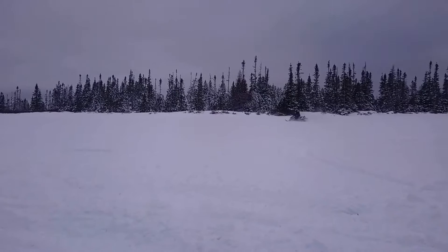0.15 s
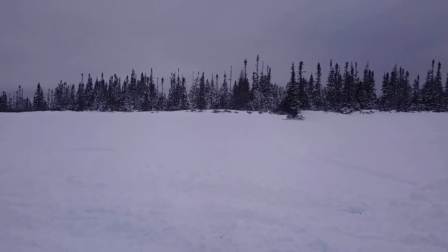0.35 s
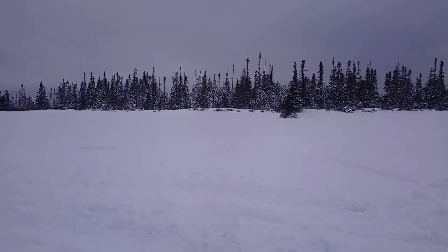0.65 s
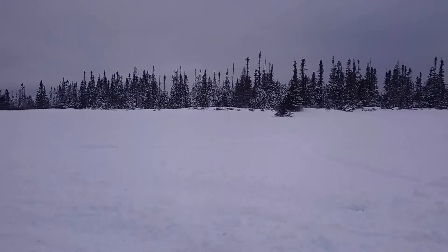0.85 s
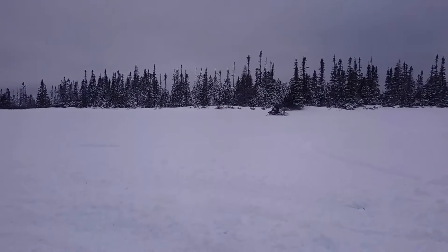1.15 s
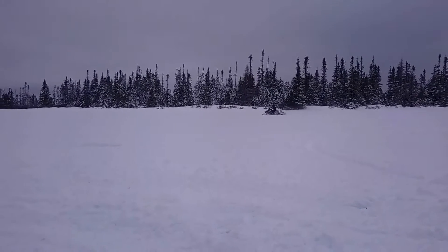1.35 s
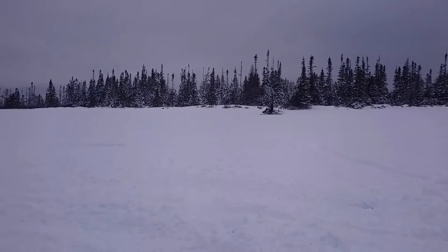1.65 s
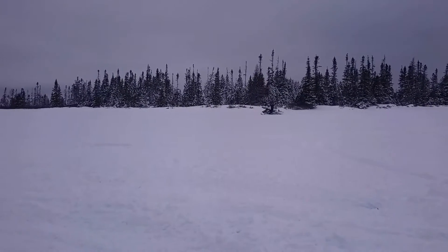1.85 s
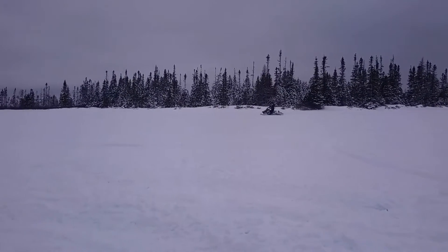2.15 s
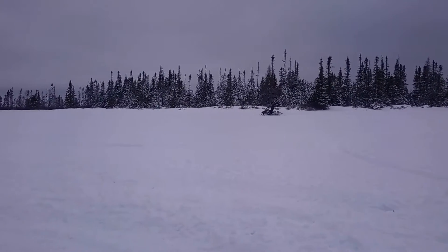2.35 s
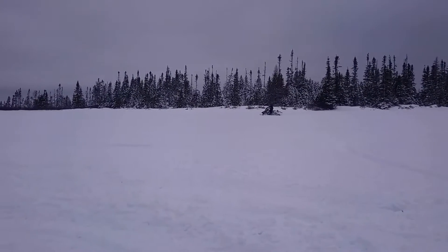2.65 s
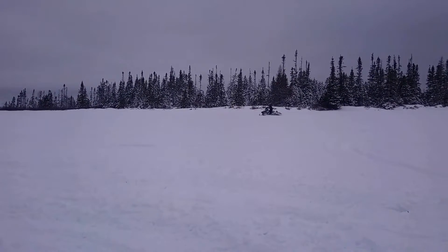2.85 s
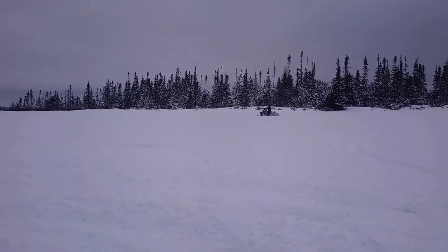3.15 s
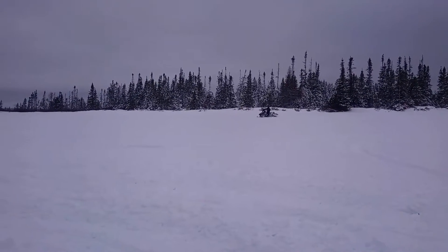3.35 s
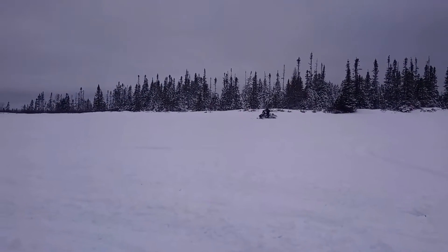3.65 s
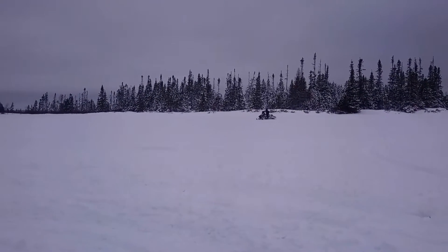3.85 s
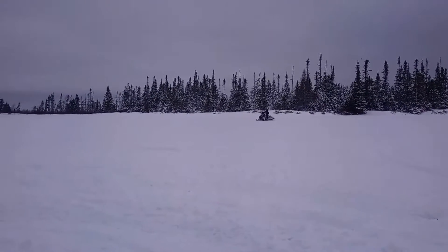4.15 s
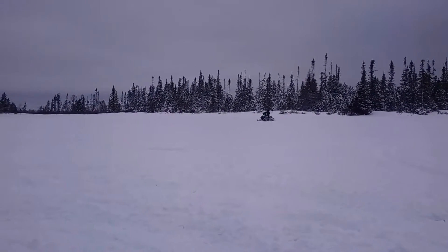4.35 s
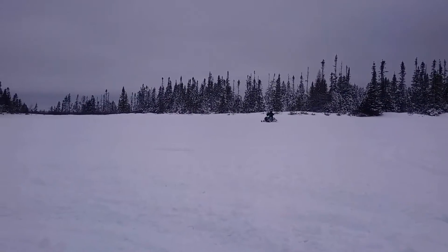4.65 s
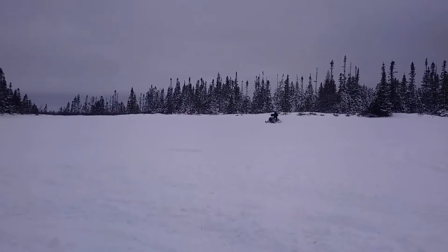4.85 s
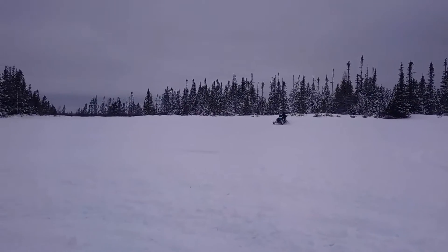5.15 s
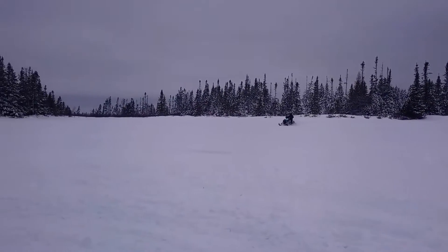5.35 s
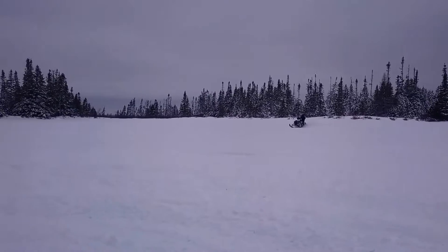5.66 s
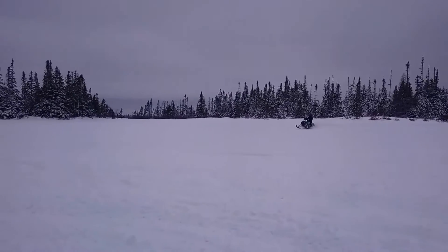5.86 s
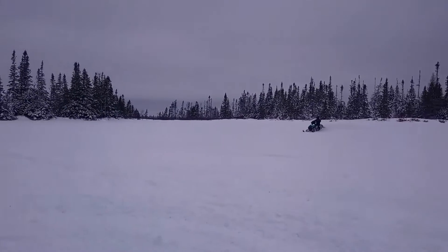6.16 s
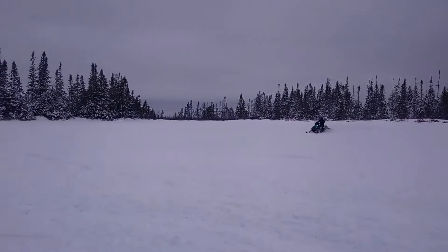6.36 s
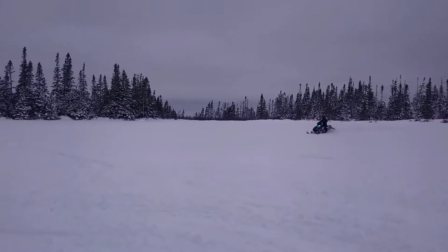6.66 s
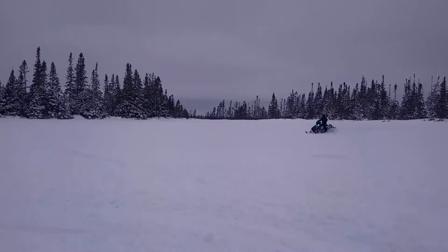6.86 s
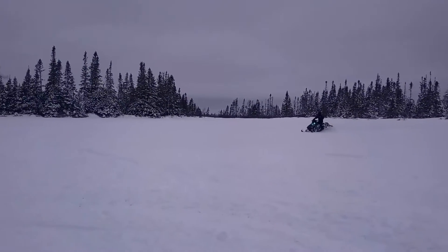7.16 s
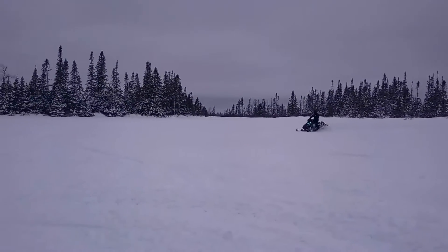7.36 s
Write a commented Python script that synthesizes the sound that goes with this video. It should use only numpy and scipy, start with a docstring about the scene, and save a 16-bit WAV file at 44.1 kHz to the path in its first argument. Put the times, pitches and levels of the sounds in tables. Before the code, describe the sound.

Faint buzzing snowmobile revs from afar over light wind, two sudden loud high-pitched two-stroke bursts with tree echoes, then the engine drops away.

```python
"""Wind buffets two ports over a faint rustle and hiss; then a two-cylinder two-stroke snowmobile blips from afar.
Two hard bursts on the tuned pipe follow, then coasting. The engine is a pulse train mixed with noise, plus
low harmonics; a line of spruces returns it as a convolution with many sparse echoes. Wind, snow spray, field
rustle and hiss are filtered noises. Two unlike ports, set in opposite polarity, colour exhaust, spray and rustle."""
import sys
import numpy as np
from scipy import signal
from scipy.fft import rfft, irfft, next_fast_len
from scipy.io import wavfile
from scipy.ndimage import uniform_filter1d

SR = 44100
rng = np.random.default_rng(int(sys.argv[2]) if len(sys.argv) > 2 else 0)


def wav_out(sig):
    """Save sig, one row per channel (or a flat mono array), as 16-bit PCM at SR to the path in sys.argv[1]."""
    wavfile.write(sys.argv[1], SR, np.round(np.clip(np.atleast_2d(sig).T, -1, 1) * 32767).astype(np.int16))


N = 331191
CONTROL_STEP = 64  # samples between control points


def from_db(db):
    """Level definition: amplitude is ten to the power of level over 20."""
    return 10 ** (np.asarray(db) / 20)


def rms_one(x):
    """Normalization: scale to unit root mean square."""
    return x / np.sqrt(np.mean(x ** 2) + 1e-20)


def in_time(rows, count=N):
    """Linear interpolation: one curve over the samples for each column after t."""
    t, *columns = np.transpose(rows)
    return [np.interp(np.arange(count) / SR, t, column) for column in columns]


def at_hz(points, hz):
    """Logarithmic frequency scale: interpolate a spectrum between its points."""
    table_hz, values = np.array(points).T
    return np.interp(np.log(hz + 1), np.log(table_hz), values)


def butter(x, hz, kind, order=2):
    """Maximally flat filtering: a Butterworth section cascade."""
    return signal.sosfilt(signal.butter(order, hz, kind, fs=SR, output="sos"), x)


def coloured_noise(points):
    """Spectral shaping: two unrelated white noises take a given spectrum, at unit rms."""
    size = next_fast_len(N)
    gain = from_db(at_hz(points, np.fft.rfftfreq(size, 1 / SR)))
    spectrum = rfft(rng.standard_normal((2, size))) * gain
    return rms_one(irfft(spectrum, size)[:, :N])


def drift(rate_hz):
    """Low-pass random process: slow chance for each channel, at unit rms."""
    chance = rng.standard_normal((2, N + SR))
    return rms_one(butter(chance, rate_hz, "low")[:, SR:])  # the filter settles in the first second


def control_time():
    """Decimated time base: the control instants in seconds."""
    return np.arange(0, N + CONTROL_STEP, CONTROL_STEP) / SR


def to_samples(slow):
    """Linear interpolation: bring a control curve to every sample."""
    return np.interp(np.arange(N) / SR, control_time(), slow)


# Gusts on the ports: t/s, mean peak level of the two sides before drift/dB, left minus right/dB
GUST_PEAKS = [(.11, -50, 14), (.44, -50, 7), (.62, -53, 0.5), (.72, -59, 22), (1.09, -56.5, 21),
              (1.28, -56, 6), (1.42, -61, 11), (1.749, -53, 9), (2.049, -61, 21), (2.16, -56, 20),
              (2.76, -52.5, 3), (3.2, -52.5, 17.5), (3.35, -56, 20.5), (3.409, -57.5, 22),
              (3.521, -51.5, 17), (3.83, -59.5, 15), (4.29, -58, 19), (4.73, -57, 19), (4.83, -55, 22),
              (4.98, -53, -24), (5.541, -49, -13), (5.69, -42.5, -14), (5.99, -45, -1), (6.14, -41.5, 1),
              (6.23, -36.5, -9), (6.3, -37, -11), (6.401, -46, -7), (6.47, -49, -11), (7.46, -55, 3)]
GUST_RISE_DB_PER_S, GUST_FALL_DB_PER_S = 286, 253
BREEZE_DB, BREEZE_LEAN_DB = -64, 3.5  # mean of the sides; left minus right


def gusts():
    """Envelope maximum: at each port the strongest gust rules, above the floor of a steady breeze."""
    t, peak_db, lean_db = np.transpose(GUST_PEAKS)[:, :, None]
    since = control_time() - t
    shape = peak_db + np.minimum(GUST_RISE_DB_PER_S * since, -GUST_FALL_DB_PER_S * since)
    sides = []
    for side in (.5, -.5):  # left, right
        strongest = (shape + side * lean_db).max(axis=0)
        sides.append(to_samples(np.maximum(strongest, BREEZE_DB + side * BREEZE_LEAN_DB)))
    return np.array(sides)


# Spectrum of the wind rumble before its bass cut: f/Hz, relative density per Hz/dB
WIND_SPECTRUM = [(12, -54), (20, -22), (22, -43), (41, 3.5), (70, -0.5), (89, -3.5), (221, -22.5),
                 (260, -37), (340, -86), (570, -120)]
WIND_OPPOSED = 0.34  # share of the other port's rumble, inverted
FLUTTER_TOP_HZ = 346
FLUTTER_DB, FLUTTER_GROWTH = -14.5, 1.7  # level re the loudest gust; dB per dB of gust level


def wind():
    """Turbulent pressure: lumpy rumble at each port, with a higher flutter that grows faster than the gust."""
    side_db = gusts()
    rumble = butter(coloured_noise(WIND_SPECTRUM), 50, "high", order=4)
    rumble = rumble - WIND_OPPOSED * rumble[::-1]  # pressure on one port draws on the other
    rumble = rumble * from_db(side_db + 2.8 * drift(6.7))
    white = rng.standard_normal((2, N))
    flutter = rms_one(butter(white, [FLUTTER_TOP_HZ / 2, FLUTTER_TOP_HZ], "band"))
    loudest = side_db.max()
    flutter_db = loudest + FLUTTER_DB + FLUTTER_GROWTH * (side_db - loudest) + 2.0 * drift(15)
    return rumble + flutter * from_db(flutter_db)


def port(colour, modes, lag, size=4096):
    """Minimum-phase principle: a causal response follows from its level, then takes the port's group delay."""
    hz = np.fft.rfftfreq(size, 1 / SR)
    level_db = at_hz(colour, hz)
    for centre_hz, width_hz, db in modes:
        level_db = level_db + db / (1 + (2 * (hz - centre_hz) / width_hz) ** 2)
    cepstrum = irfft(level_db * np.log(10) / 20, size)
    cepstrum[1:size // 2] *= 2
    cepstrum[size // 2 + 1:] = 0  # folding the cepstrum makes the response causal
    delay = np.exp(-2j * np.pi * np.cumsum(at_hz(lag, hz)) * hz[1] / 1000)
    return irfft(np.exp(rfft(cepstrum)) * delay, size)[:size // 2]


# Broad colour of each port before its modes: f/Hz, relative level/dB
LEFT_COLOUR = [(400, -26.5), (600, -23), (850, -23), (1200, -26), (1800, -17.5), (2500, -13), (3300, -13),
               (4500, -10.5), (6000, -5), (8000, -8.5), (9300, -17), (10500, -24.5), (12500, -39),
               (15000, -32.5)]
RIGHT_COLOUR = [(400, -34), (600, -22), (850, -18.5), (1200, -8.5), (1800, -3.5), (2500, -4.5),
                (3300, -0.4), (4500, -4), (6000, -9.5), (8000, -10.5), (9300, -22), (10500, -32),
                (12500, -39.5), (15000, -32.5)]
# Peaks and notches from housing, hand and body round each port: f/Hz, width/Hz, level/dB
LEFT_PEAKS = [(1230, 2500, 5), (2030, 110, 0), (2550, 240, -15), (2700, 310, 13), (2940, 200, 2),
              (3540, 330, 10), (3915, 325, -35.5), (4257, 174, 18.5), (4420, 170, 4), (5400, 220, -3),
              (5690, 260, 8.5), (5845, 57, -15), (6412, 630, 12), (6520, 97, -28), (7850, 160, 3),
              (7334, 320, -7.5), (7378, 203, 13.5), (8500, 73, 6.5), (8400, 82, 11.5), (8934, 290, 15.5)]
RIGHT_PEAKS = [(944, 530, 10), (1278, 200, -8.5), (1612, 100, 6), (1843, 110, -14), (2450, 170, 6),
               (2561, 52, 7.5), (3037, 356, 12), (3520, 255, -10), (3747, 227, 8.5), (3950, 120, -3.5),
               (4123, 150, 8), (4878, 393, 13.5), (4980, 230, -22), (6700, 54, 10.5), (6624, 440, -8.5),
               (6818, 99, 20), (7800, 100, 1), (9000, 120, -28)]
# Group delay of the duct before the right port: f/Hz, delay/ms
RIGHT_DUCT = [(1000, 0.53), (2300, 1.668), (3100, 1.19), (4200, 0.37), (8000, 0.26)]


def heard(x):
    """Linear reception: convolve a far sound with two ports of opposite polarity, unit deviation in their mean."""
    left = port(LEFT_COLOUR, LEFT_PEAKS, [(1, 0)])  # no delay
    right = -port(RIGHT_COLOUR, RIGHT_PEAKS, RIGHT_DUCT)
    out = signal.fftconvolve(x, np.array([left, right]), axes=1)[:, :N]
    return out / np.std(out.mean(axis=0))


SHARED_NOISE = 0.82  # amplitude of the part common to both ports


def partly_shared_noise():
    """Partial coherence: white noise with a common part and an independent part at each port."""
    shared, *own = rng.standard_normal((3, N))
    return SHARED_NOISE * shared + np.sqrt(1 - SHARED_NOISE ** 2) * np.array(own)


# Snow thrown by track and skis: t/s, level before drift/dB
SPRAY_LEVEL = [(0, -82), (1.8, -81), (2.9, -67.5), (3.5, -67.5), (4.2, -74), (4.5, -64), (4.9, -55.5),
               (5.9, -48), (6.2, -80), (6.45, -55.5), (6.6, -51), (6.85, -56), (7.1, -61.5), (7.51, -62)]
SPRAY_CUT_HZ = 4940
FIELD_DB, FIELD_CUT_HZ = -69, 2530  # far rustle of wind in the spruces, level before drift


def snow_and_field():
    """Broadband noise: high-passed spray behind the machine over a low-passed, gently drifting far rustle."""
    spray = heard(butter(partly_shared_noise(), SPRAY_CUT_HZ, "high"))
    spray = spray * from_db(in_time(SPRAY_LEVEL)[0] + 0.5 * drift(1.3)[0])
    rustle = heard(butter(partly_shared_noise(), FIELD_CUT_HZ, "low", order=1))
    return spray + from_db(FIELD_DB + 1.9 * drift(2.1)[0]) * rustle


# Spectrum of the steady hiss: f/Hz, relative density per Hz/dB
HISS_SPECTRUM = [(100, -24), (250, -11), (700, -9.5), (2000, -11), (5000, -11.5), (9000, -22),
                 (11000, -31.5), (15000, -26)]
HISS_DB = -61.5


def hiss():
    """Stationary noise: an unchanging spectrum, unrelated at the two sides."""
    return from_db(HISS_DB) * coloured_noise(HISS_SPECTRUM)


# Throttle blips from afar: opening t/s, loudest t/s, firing rate at opening f/Hz, firing rate at the top f/Hz,
# drop at shut-off before each shape's multiple/dB, then peak levels of treble/dB, body/dB and low tones/dB
THROTTLE_BLIPS = [(0.137, 0.267, 134, 194, 3.5, -56.5, -45.5, -64.5),
                  (0.951, 1.142, 120, 182, 6, -53, -46, -66), (1.8, 2.019, 133, 188, 5, -49, -43.5, -62),
                  (2.649, 2.86, 132, 223, 4.5, -46, -48.5, -60), (3.6, 3.761, 140, 196, 5, -49, -47.5, -62),
                  (4.059, 4.189, 142, 193, 4, -48, -50, -60), (4.422, 4.575, 155, 216, 3.5, -44, -41, -57)]
OVERRUN_S = .055  # speed keeps climbing after the loudest moment
# Swell and decay: rise dB/s, multiple of the blip's drop, drop time s, slow fade dB/s, floor dB
TREBLE_SHAPE = (96, 2.04, 0.22, 20.5, -68)
BODY_SHAPE = (117, 4, 0.06, 15, -71)
HUM_SHAPE = (55, 4.5, 0.2, 18, -95)


def blip_level(peak_db, rise, drop_multiple, drop_s, fade, floor_db):
    """Exponential relaxation: a blip swells, drops quickly at throttle shut-off, then fades; the loudest rules."""
    _, top, _, _, drop_db, *_ = np.transpose(THROTTLE_BLIPS)[:, :, None]
    since = control_time() - top
    after = np.maximum(since, 0)
    swell = rise * np.minimum(since, 0)
    drop = drop_multiple * drop_db * (1 - np.exp(-after / drop_s))
    level_db = peak_db[:, None] + swell - drop - fade * after
    return to_samples(np.maximum(level_db.max(axis=0), floor_db))


# Engine speed through bursts and coast, before smoothing: t/s, firing rate f/Hz
LATER_SPEED = [(4.658, 219), (4.804, 207.6), (4.836, 215.4), (4.93, 245.8), (5.006, 267.6), (5.036, 274.5),
               (5.08, 281), (5.138, 281.2), (5.162, 277.8), (5.25, 251.3), (5.322, 241.8), (5.406, 248.7),
               (5.532, 269.8), (5.598, 276.6), (5.67, 279.8), (5.86, 281.7), (5.888, 271.9), (5.97, 236),
               (6.1, 195), (6.3, 162), (6.5, 148), (6.7, 127), (7.0, 110), (7.51, 100)]
IDLE_PER_S = 120  # firings per second


def speed():
    """Rotational inertia: speed climbs while the throttle is open, sags until the next blip, and is smoothed."""
    rows = [(0.00079, IDLE_PER_S)]
    for opens, top, low, high, *_ in THROTTLE_BLIPS:
        rows += [(opens, low), (top + OVERRUN_S, high)]
    return uniform_filter1d(in_time(rows + LATER_SPEED)[0], size=SR // 30)


# Spells on the tuned pipe: start t/s, end t/s
ON_PIPE_SPELLS = [(4.9, 5.2), (5.48, 5.95)]
# Pulses against rush: body share 0-1, treble share 0-1, weakness of one cylinder 0-1
LOOSE, CATCHING, PULLING = (.2, .1, .6), (.9, .6, .7), (.985, .82, .7)
ON_PIPE, OFF_PIPE = (.998, .99, .15), (.99, .77, .2)
CATCH_S, LET_GO_S = .07, .11


def firmness():
    """Periodic-to-random ratio: firings firm up under load, loosen at shut-off, and are near clean on the pipe."""
    rows = []
    for opens, top, *_ in THROTTLE_BLIPS:
        rows += [(opens, *LOOSE), (opens + CATCH_S, *CATCHING)]
        rows += [(top + OVERRUN_S / 2, *PULLING), (top + LET_GO_S, *LOOSE)]
    rows[-1] = (ON_PIPE_SPELLS[0][0] - LET_GO_S, *PULLING)  # the last blip runs on into the first burst
    for start, end in ON_PIPE_SPELLS:
        rows += [(start - LET_GO_S + .01, *OFF_PIPE), (start, *ON_PIPE)]
        rows += [(end, *ON_PIPE), (end + CATCH_S, *OFF_PIPE)]
    rows.append((rows[-1][0] + 2 * LET_GO_S, *LOOSE))
    return in_time(rows)


JITTER_S, STRENGTH_SPREAD_DB = 6e-6, .6  # standard deviations over the firings


def firings(cycles, weakness, count=8):
    """Band-limited impulse train: one sharp pulse per firing, alternate cylinders differing in strength."""
    turns = np.arange(1, int(cycles[-1]))
    chance = rng.standard_normal((2000, 2))[:len(turns)]
    at = np.interp(turns, cycles, np.arange(N)) + JITTER_S * SR * chance[:, 0]
    strength = from_db(STRENGTH_SPREAD_DB * chance[:, 1])
    strength = strength * (1 - weakness[at.astype(int)] * (turns % 2))
    taps = at.astype(int)[:, None] + np.arange(-count, count + 1)
    offset = taps - at[:, None]  # pulses fall between samples
    pulse = np.sinc(offset) * np.cos(np.pi * offset / (2 * count + 2)) ** 2
    out = np.zeros(N + 2 * count)
    np.add.at(out, taps, strength[:, None] * pulse)
    return out[:N]


# Exhaust resonances added to the direct pulses: f/Hz, width/Hz, level/dB
PIPE_RESONANCES = [(970, 210, -4.5), (2770, 56, -8), (4660, 57, -16), (6000, 170, -6.5)]
EXHAUST_BASS_CUT_HZ = 530


def exhaust_pulses(per_s, cycles, weakness):
    """Pipe resonance: the pulse train, its power evened over speed, excites narrow bands in parallel."""
    pulses = firings(cycles, weakness) * np.sqrt(SR / per_s)
    pulses = butter(pulses, EXHAUST_BASS_CUT_HZ, "high", order=4)
    ringing = 0
    for hz, width_hz, db in PIPE_RESONANCES:
        band = [hz - width_hz / 2, hz + width_hz / 2]
        ringing = ringing + from_db(db) * butter(pulses, band, "band", order=1)
    return pulses + ringing


RUSH_TOP_HZ = 4800


def gas_rush(cycles):
    """Amplitude modulation: gas and track noise throbs at the firing rate and half of it, and drifts slowly."""
    throb = 1 + 0.033 * np.cos(np.pi * cycles) + 0.029 * np.cos(2 * np.pi * cycles)  # gas leaves in puffs
    noise = rms_one(butter(partly_shared_noise(), RUSH_TOP_HZ, "low", order=1))
    return throb * from_db(2.35 * drift(4.1)[0]) * noise


# Low hum, before the port gains: t/s, levels of firing rate/dB, second multiple/dB, third multiple/dB
HUM_HARMONICS = [(0, -78, -99, -99), (4.32, -75, -85, -99), (4.65, -58, -62, -99), (4.85, -62, -67, -99),
                 (5.1, -50, -62, -99), (5.62, -55, -63, -99), (5.7, -40, -43, -99), (5.87, -39, -42, -99),
                 (5.95, -67, -70, -90), (6.35, -59.5, -58.5, -73), (6.7, -63.5, -59, -67),
                 (7.51, -51, -75, -64)]
# Low exhaust tones of a blip: multiple of the firing rate, level re the blip's low tones/dB
BLIP_PARTIALS = [(2, -3.5), (3, -0.1), (3.5, 3)]
# Low-tone gain in opposite polarity: one row per port, left then right [linear gain]
HUM_GAINS = [
    [.55],
    [-1],
]
BETWEEN_MULTIPLE, BETWEEN_DB = 2.5, -31  # a tone between the main ones: multiple of firing rate, level re treble


def low_tones(cycles, treble_db, hum_top_db):
    """Harmonic synthesis: sines locked to the firing phase, reaching the ports in opposite polarity."""
    turn = 2 * np.pi * cycles
    hum = 0
    for multiple, db in enumerate(in_time(HUM_HARMONICS), start=1):
        hum = hum + from_db(db) * np.sin(multiple * turn)
    partials = sum(from_db(db) * np.sin(multiple * turn) for multiple, db in BLIP_PARTIALS)
    blips = from_db(blip_level(hum_top_db, *HUM_SHAPE)) * partials
    between = from_db(treble_db + BETWEEN_DB) * np.sin(BETWEEN_MULTIPLE * turn)
    return (hum + blips + between) * HUM_GAINS


# Two hard bursts on the pipe, one list each: t/s, exhaust treble level/dB, exhaust body level/dB
BURST_LEVELS = [
    [(4.654, -44.5, -55), (4.824, -46.5, -50.5), (4.918, -38, -40.5), (4.968, -21.5, -48), (5.02, -16, -62),
     (5.154, -13, -46), (5.2, -19, -31), (5.21, -23.5, -32.5), (5.234, -48, -35)],
    [(5.422, -34, -31.5), (5.438, -26, -30), (5.504, -17, -35), (5.696, -12.5, -61), (5.806, -8.5, -31.5),
     (5.888, -11.5, -24.5), (5.91, -33, -28)],
]
# Throttle shut: t/s, exhaust treble level/dB, exhaust body level/dB
COAST_LEVELS = [(5.925, -39, -37.5), (5.97, -34.5, -39), (6.1, -44.5, -59), (6.55, -61.5, -55.5),
                (7.0, -61.5, -67), (7.51, -64, -65)]
BODY_HZ = 1400  # crossover between body and treble


def engine():
    """Source-filter principle: firing pulses and gas rush, split into dull body and bright edge, plus low tones."""
    per_s = speed()
    cycles = np.cumsum(per_s) / SR
    *_, treble_top_db, body_top_db, hum_top_db = np.transpose(THROTTLE_BLIPS)
    far_levels = [blip_level(treble_top_db, *TREBLE_SHAPE), blip_level(body_top_db, *BODY_SHAPE)]
    near_levels = in_time(sum(BURST_LEVELS, []) + COAST_LEVELS)
    far = np.arange(N) / SR < BURST_LEVELS[0][0][0]
    treble_db, body_db = np.where(far, far_levels, near_levels)
    body_share, treble_share, weakness = firmness()
    pulses = exhaust_pulses(per_s, cycles, weakness)
    rush = gas_rush(cycles)
    out = 0
    for kind, sign, level_db, share in (("low", -1, body_db, body_share), ("high", 1, treble_db, treble_share)):
        mix = share * pulses + np.sqrt(1 - share ** 2) * rush
        # opposite signs keep both halves in step where they overlap
        out = out + sign * from_db(level_db) * heard(butter(mix, BODY_HZ, kind))
    return out + low_tones(cycles, treble_db, hum_top_db)


# Echo gain of the spruce line before flutter: delay t/s, left low level/dB, left high level/dB,
# right low level/dB, right high level/dB
SPRUCE_ECHOES = [(.05, -18, -61, -37, -52), (.1, -17.5, -44, -51.5, -74), (.18, -24.5, -58, -19.5, -26.5),
                 (.24, -24, -80, -27, -38), (.4, -35, -91, -28, -72), (.55, -38, -86, -38, -82),
                 (.8, -45, -68, -55, -85)]
TREE_SPLIT_HZ, TREE_BASS_CUT_HZ, TREES_PER_S = 2030, 976, 250  # the last: mean echoes per second of delay
ECHO_FLUTTER_DB = 2.5  # rms


def spruces(direct, count=6):
    """Multiple scattering: random trunks return echoes in two bands; each clump flutters on its own."""
    size = int(SPRUCE_ECHOES[-1][0] * SR)
    trunks = (rng.random((2, SR)) < TREES_PER_S / SR) * rng.standard_normal((2, SR))
    clump = rng.integers(0, count, (2, SR))[:, :size]
    left_low, left_high, right_low, right_high = from_db(in_time(SPRUCE_ECHOES, count=size))
    trunks = trunks[:, :size] * (np.arange(size) > SPRUCE_ECHOES[0][0] * SR)  # silent before the nearest tree
    out = 0
    for k in range(count):
        some = trunks * (clump == k)
        low = butter(some * [left_low, right_low] + 1e-18, [TREE_BASS_CUT_HZ, TREE_SPLIT_HZ], "band")
        high = butter(some * [left_high, right_high] + 1e-18, TREE_SPLIT_HZ, "high")
        echo = signal.fftconvolve(direct, low - high, axes=1)[:, :N]
        out = out + from_db(ECHO_FLUTTER_DB * drift(10.6)) * echo
    return out


def scene():
    """Superposition: engine, its echoes, snow and field, wind and hiss add linearly."""
    direct = engine()
    return direct + spruces(direct) + snow_and_field() + wind() + hiss()


CUTOFF_HZ = 15800  # stopband edge


def record(dry):
    """Saturation and band limiting: peaks are rounded, then the top is cut."""
    rounded = .97 * np.tanh(dry / .97)
    return signal.sosfilt(signal.cheby2(14, 90, CUTOFF_HZ, fs=SR, output="sos"), rounded)


dry = scene()
out = record(dry)
wav_out(out)
```